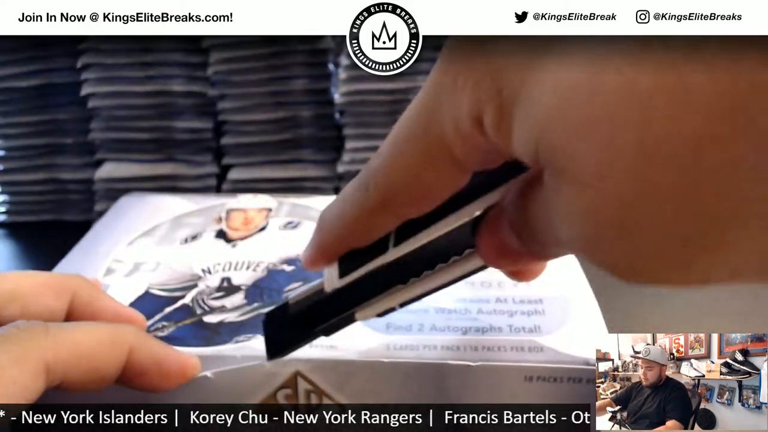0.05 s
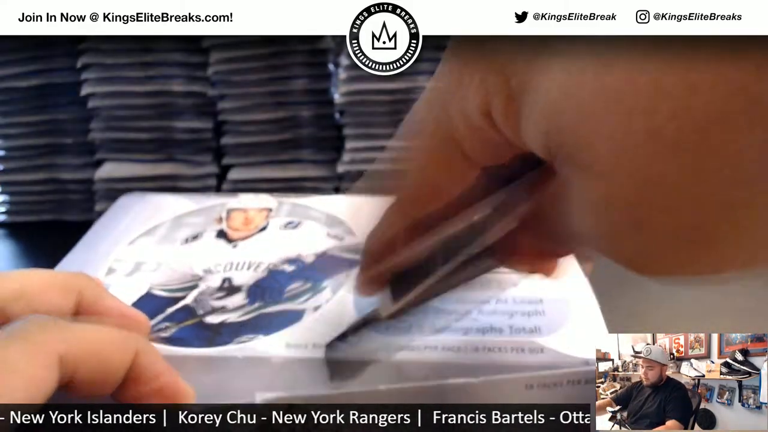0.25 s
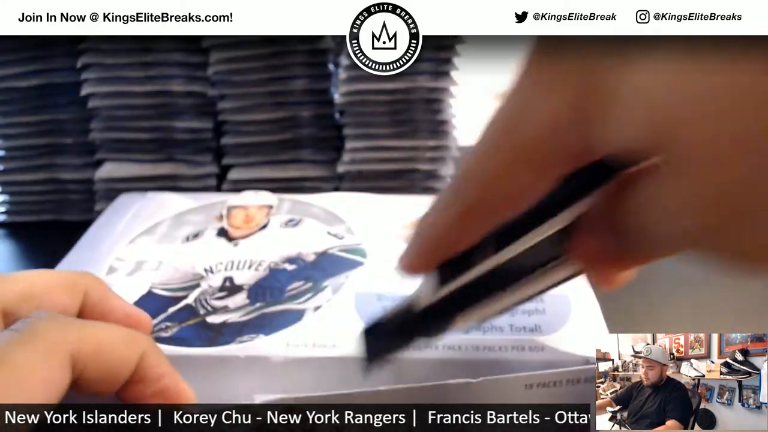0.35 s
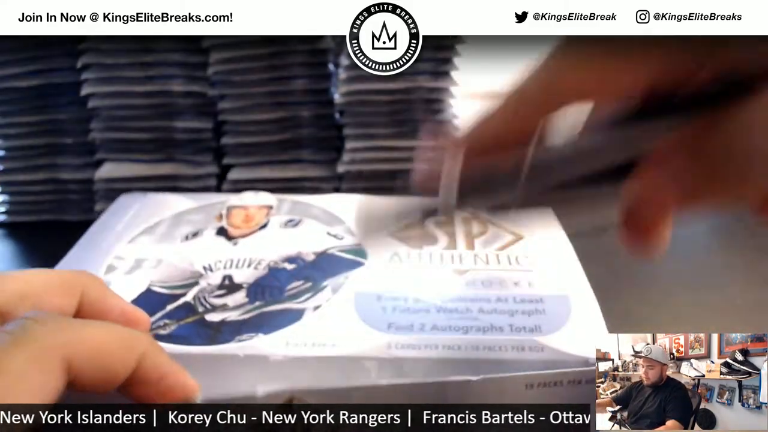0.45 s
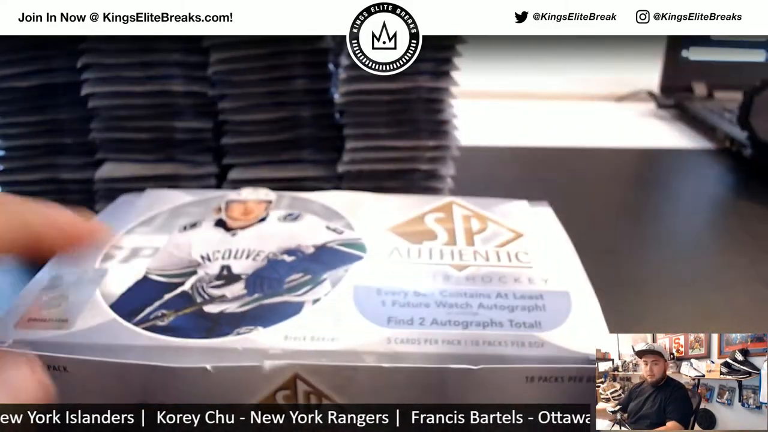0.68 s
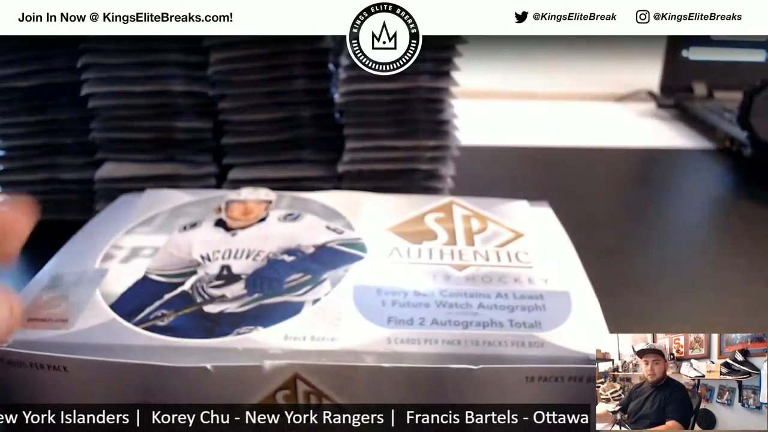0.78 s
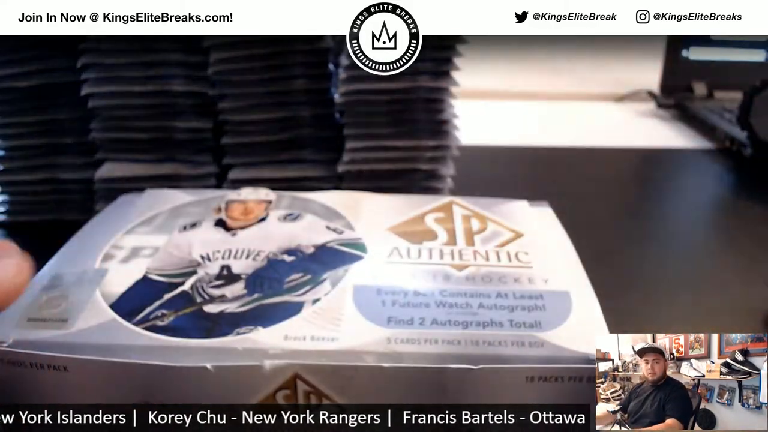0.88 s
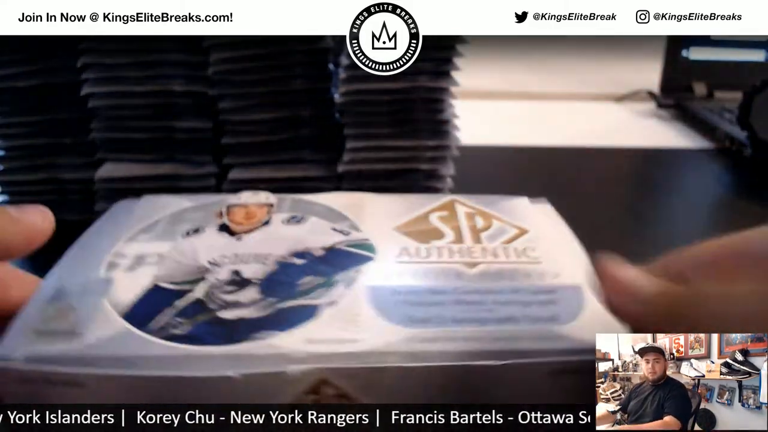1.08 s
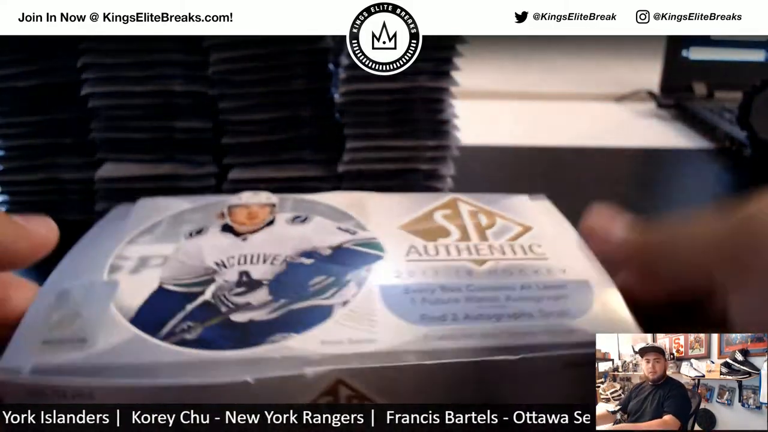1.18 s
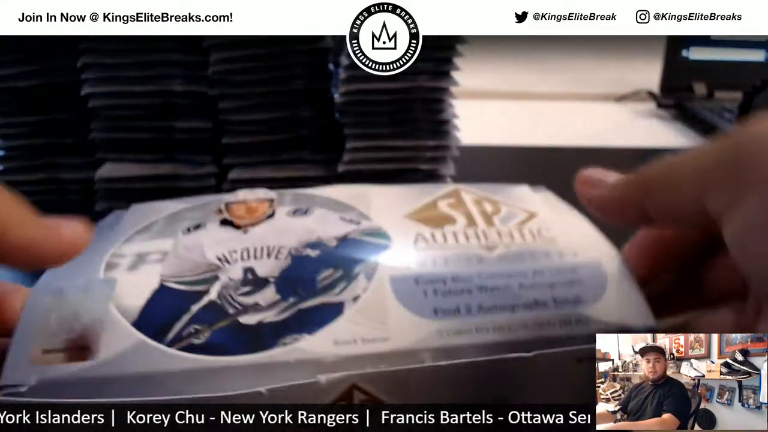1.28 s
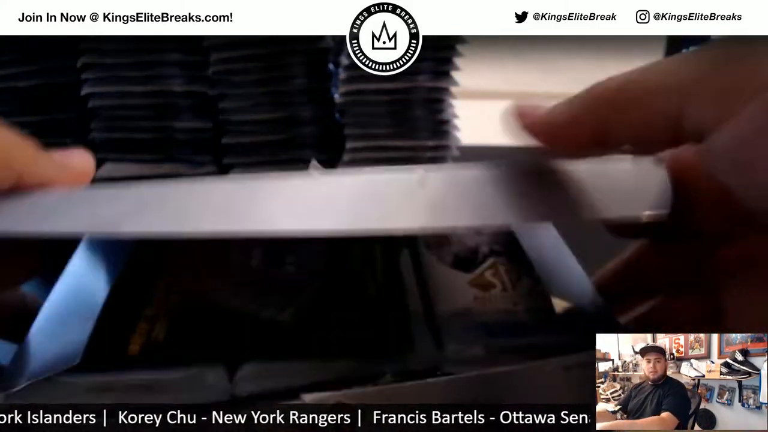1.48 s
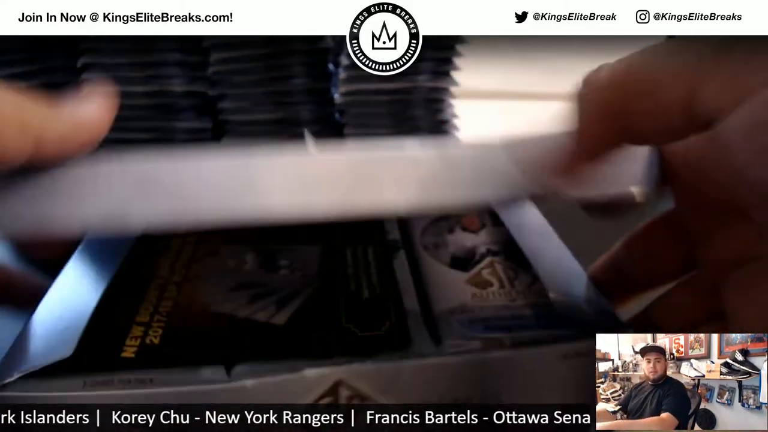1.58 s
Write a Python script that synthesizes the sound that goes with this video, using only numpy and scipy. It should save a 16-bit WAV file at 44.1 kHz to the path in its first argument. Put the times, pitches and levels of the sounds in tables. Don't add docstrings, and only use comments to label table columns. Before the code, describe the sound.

Close microphone in a quiet furnished room: a bright plastic crack as a box is cut, a quick ratcheting click, a tool dropped on a tabletop, soft fingertip taps, then a cardboard lid springs free.

```python
import sys
import numpy as np
from scipy import signal
from scipy.fft import rfft, irfft
from scipy.io import wavfile
from scipy.ndimage import uniform_filter1d

SR = 44100
rng = np.random.default_rng(int(sys.argv[2]) if len(sys.argv) > 2 else 0)


def volts_from_decibels(level):
    exponent = np.asarray(level, float) / 20
    return 10 ** exponent


def wav_out(sig):
    wavfile.write(sys.argv[1], SR, np.round(np.clip(np.atleast_2d(sig).T, -1, 1) * 32767).astype(np.int16))


N = 72765
T = np.arange(N) / SR


def unit(x):
    return x / np.sqrt(np.mean(x ** 2))


def curve(rows):
    time_s, level_db = np.array(rows, float).T
    return volts_from_decibels(np.interp(T, time_s, level_db))


def colour(x, points):
    hz, db = np.array(points, float).T
    log_hz = np.log(np.maximum(np.fft.rfftfreq(len(x), 1 / SR), 1))
    gain = volts_from_decibels(np.interp(log_hz, np.log(hz), db))
    return unit(irfft(rfft(x) * gain, len(x)))


def band(x, hz, width_hz):
    b, a = signal.iirpeak(min(hz, 0.4 * SR), hz / width_hz, SR)
    return signal.lfilter(b, a, x)


def struck(modes, hits):
    spot_db = 1.2
    out = np.zeros(N)
    spots = rng.standard_normal((len(hits), len(modes)))
    for (hz, mode_db, t60_s), mode_spots in zip(modes, spots.T):
        push = np.zeros(N + 400)
        for (start_s, hit_db, contact_ms), spot in zip(hits, mode_spots):
            length = int(np.clip(contact_ms * SR / 1000, 3, 390))
            i = int(start_s * SR)
            bump = np.hanning(length + 2)[1:-1] * 2 / length
            push[i:i + length] += bump * volts_from_decibels(hit_db + mode_db + spot_db * spot)
        decay = np.log(1000) / (max(t60_s, 0.005) * SR)
        pole = np.exp(2j * np.pi * hz / SR - decay)
        ring = signal.lfilter([1], [1, -pole], push[:N]).imag
        b, a = signal.butter(2, hz / 3, "high", fs=SR)
        out += signal.lfilter(b, a, ring)
    return out


def box_cut():
    # pitch_hz, level_db, t60_s
    box_modes = [(129.6, -4.5, 0.15), (163, -9.5, 0.098), (242, -5.5, 0.069), (360, -4.5, 0.037),
                 (452.5, 2.5, 0.036), (532.6, 6, 0.032), (707, -3, 0.034), (1109.5, 3.5, 0.047),
                 (1163, -5, 0.051), (1324, -2, 0.02), (1420, -6, 0.045), (1626, -30, 0.12),
                 (2135, -11, 0.027)]
    # start_s, level_db, contact_ms
    box_hits = [
        (0.1642, -46, 0.92),
        (0.1749, -16.5, 0.39),
        (.1772, -26, 1),
        (0.188, -32.5, 0.47),
        (0.194, -37, 0.19),
    ]
    return struck(box_modes, box_hits)


def cracks():
    # start_s, level_db, centre_hz, fade_ms
    bursts = [(0.115, -58.5, 5000, 1.6), (0.1709, -10, 6030, 0.7), (.1735, -20, 5400, 1.1),
              (.182, -24, 6650, 0.67), (0.194, -27, 4740, 1.3), (.449, -26, 4900, 1.26),
              (0.4636, -27.5, 5200, 2.2), (0.475, -36, 7460, 1.7), (.4815, -25.5, 6600, 1.9),
              (.492, -26, 7600, 1.14), (0.5154, -27, 4860, 2.13), (.526, -46, 4130, 2.5),
              (0.8469, -27, 3100, 3.3), (.856, -34, 3600, 13.6), (.868, -42, 3960, 2.9),
              (1.058, -47.5, 3500, 2.5), (1.141, -58.5, 3480, 2.1), (1.229, -48, 4000, 3.4),
              (1.306, -41, 2500, 12), (1.317, -36.5, 4000, 4), (1.327, -28, 4930, 5.9),
              (1.351, -38, 4500, 2), (1.38, -30, 4180, 1.56), (1.526, -46.5, 2890, 3.9),
              (1.617, -47, 2800, 2.4)]
    width = 1.26
    rise_ms, tail_db, tail_ms = 0.4, -21, 6.8
    length = 2000
    out = np.zeros(N + length)
    age_ms = np.arange(length) / SR * 1000
    noises = rng.standard_normal((len(bursts), length))
    for (start_s, level_db, hz, fade_ms), noise in zip(bursts, noises):
        i = int(start_s * SR)
        tone = band(band(noise, hz, width * hz), hz, width * hz)
        fade = np.exp(-age_ms / fade_ms) + volts_from_decibels(tail_db) * np.exp(-age_ms / tail_ms)
        rise = np.minimum(age_ms / rise_ms, 1)
        out[i:i + length] += volts_from_decibels(level_db) * unit(tone) * fade * rise
    return out[:N]


def cutter_drop():
    # pitch_hz, level_db, t60_s
    table_modes = [(54.4, -30, 0.45), (114.3, -2.5, 0.13), (173, -19, 0.095), (233, 2.5, 0.033),
                   (298.2, 0.5, 0.11), (414, 3.5, 0.017), (620, 0.5, 0.017), (788, -0.5, 0.015),
                   (1193, -11, 0.047), (1360, -17, 0.098), (1844, -12.5, 0.051), (2400, -54, 0.032)]
    # start_s, level_db, contact_ms
    table_hits = [
        (0.846, -17.5, 0.37),
        (0.8467, -27, 2.5),
        (0.8538, -30, 1.47),
        (.863, -32, 0.27),
        (.870, -27, 0.31),
        (0.894, -30.5, 1.9),
        (0.924, -47, 0.72),
        (1.043, -40, 5.3),
        (1.085, -41, 5.9),
        (1.119, -44, 4.2),
    ]
    return struck(table_modes, table_hits)


def lid_pop():
    # pitch_hz, level_db, t60_s
    lid_modes = [(63.6, -20.5, 0.056), (95, -11, 0.101), (214, -1.5, 0.032), (264, -2.5, 0.068),
                 (391, -17.5, 0.047), (623, -38, 0.035), (950, -5.5, 0.03), (1028, 0, 0.035),
                 (1170, 3, 0.0083), (1416, -5, 0.097), (1663, -8, 0.022), (1740, -10, 0.052),
                 (2420, -7, 0.017)]
    # start_s, level_db, contact_ms
    lid_hits = [(1.229, -43.5, 0.17), (1.305, -43, 0.19), (1.316, -40, 0.45), (1.3253, -13, 1.7),
                (1.3284, -20, 0.28), (1.3311, -18, 0.47), (1.340, -22.5, 0.16), (1.347, -24, 0.62),
                (1.358, -51, .4), (1.367, -36, 0.62), (1.378, -30.5, 1.03), (1.528, -51, 0.22)]
    return struck(lid_modes, lid_hits)


def taps():
    # pitch_hz, level_db, t60_s
    tap_modes = [(86, -1.5, 0.07), (283, -2, 0.042), (520, -3.5, 0.032), (770, 6.5, 0.011),
                 (1360, 3.5, 0.012), (1860, -7, 0.023)]
    # start_s, level_db, contact_ms
    tap_hits = [(.449, -41.5, 0.49), (.454, -41.5, 0.8), (.545, -54, .5), (.635, -46, .6),
                (1.058, -40.5, 0.66), (1.117, -44, 0.64), (1.139, -38.5, 0.79), (1.146, -33.5, 0.41),
                (1.155, -39.5, 0.96), (1.164, -40.5, 0.47), (1.283, -36.5, 0.26), (1.555, -40, 0.97),
                (1.617, -42, 0.42)]
    return struck(tap_modes, tap_hits)


def grains(rate_per_s, spread_db):
    on = rng.random(N) < rate_per_s / SR
    size = rng.standard_normal(N) * volts_from_decibels(spread_db * rng.exponential(1, N))
    return on * size


def card_rustle():
    # time_s, level_db
    effort = [(.15, -125), (.168, -29), (.2, -39), (.32, -54), (.36, -51), (.42, -71.5), (.95, -70),
              (1.13, -54.5), (1.14, -36), (1.17, -49), (1.19, -60), (1.225, -56), (1.235, -47),
              (1.3, -46.5), (1.335, -25), (1.37, -29), (1.43, -51), (1.65, -56.5)]
    # pitch_hz, level_db
    card_tone = [(60, -6.5), (250, -6.5), (450, -1.5), (800, -6.5), (1200, -7), (1620, -4.5), (1950, -14),
                 (10400, -31)]
    return curve(effort) * colour(grains(5000, 1.8), card_tone)


def film_slide():
    # time_s, level_db
    movement = [(.44, -110), (.45, -42.5), (.52, -51), (.56, -59), (.66, -58.5), (.83, -64.5), (.85, -37),
                (.9, -43), (1.05, -67.5)]
    # pitch_hz, level_db
    film_tone = [(800, -6.5), (1500, -4), (2380, -9.5), (3300, -0.5), (4100, -4), (5300, -6.5),
                 (6500, -11.5), (10400, -23)]
    return curve(movement) * colour(grains(6000, 2.33), film_tone)


def table_thrum():
    # time_s, level_db
    sway_level = [(0, -59), (.165, -58), (.19, -39), (.3, -40.5), (.4, -57), (.55, -51), (.62, -53.5),
                  (.84, -56), (.93, -34), (1., -51), (1.3, -53), (1.34, -49), (1.41, -37), (1.48, -55),
                  (1.55, -41.5), (1.65, -58)]
    hz, width_hz = 32.1, 21.6
    sway = band(band(rng.standard_normal(N), hz, width_hz), hz, width_hz)
    sway = sway / np.sqrt(uniform_filter1d(sway ** 2, size=3000))
    return curve(sway_level) * sway


def room(x):
    # pitch_hz, t60_s
    room_fade = [(100, .4), (500, 0.19), (1500, 0.21), (4000, 0.58), (10000, 0.34)]
    gap_ms = 2.8
    table_hz, table_t60 = np.array(room_fade).T
    age_s = T[:SR]
    tail = np.zeros(SR)
    for hz in 60 * 2 ** np.arange(0, 8, 0.5):
        t60_s = np.interp(np.log(hz), np.log(table_hz), table_t60)
        fade = np.exp(-np.log(1000) * age_s / t60_s)
        tail += band(rng.standard_normal(SR), hz, hz / 3) * fade
    tail = tail * np.clip(age_s * 1000 / gap_ms - 1, 0, 1)
    return signal.fftconvolve(x, tail / np.sqrt(np.sum(tail ** 2)))[:N]


def room_floor():
    # pitch_hz, level_db
    floor_tone = [(30, -21.5), (60, -18), (120, 1.5), (250, -6), (500, -9.5), (1000, -15.5), (2000, -22.5),
                  (10400, -32)]
    return volts_from_decibels(-59) * colour(rng.standard_normal(N), floor_tone)


def scene():
    near = box_cut() - cutter_drop() - lid_pop() + taps()
    near = near + cracks() + card_rustle() + film_slide()
    return (near + volts_from_decibels(-11) * room(near) + table_thrum() + room_floor())[None]


def holes(x):
    hole_hz, under_limit_db, spread_db = 5500, 36, 4
    f, _, z = signal.stft(x, SR, nperseg=512)
    power = (np.abs(z[:256]) ** 2).reshape(32, 8, -1).sum(axis=1) + 1e-20
    under_db = 10 * np.log10(power.sum(axis=0) / power)
    under_db = under_db + spread_db * rng.standard_normal(power.shape)
    drop = (under_db > under_limit_db) & (f[:256:8, None] > hole_hz)
    stay = np.vstack([np.repeat(~drop, 8, axis=0), ~drop[-1:]])
    return signal.istft(z * stay, SR, nperseg=512)[1][:N]


def treble_mutes(x):
    # start_s, end_s, pitch_hz above which the sound is gone
    mutes = [
        (0.154, 0.159, 900),
        (0.157, .166, 5500),
        (0.431, 0.444, 3240),
        (0.827, 0.839, 500),
        (.839, 0.842, 5000),
        (1.129, 1.134, 3820),
        (1.219, 1.226, 5500),
    ]
    for start_s, end_s, hz in mutes:
        low_pass = signal.butter(6, hz, fs=SR, output="sos")
        high = x - signal.sosfiltfilt(low_pass, x)
        inside_s = np.minimum(T - start_s, end_s - T)
        x = x - high * np.clip(inside_s / 0.0026 + 1, 0, 1)
    return x


def roll_off(x):
    return signal.sosfilt(signal.butter(12, 11660, fs=SR, output="sos"), x)


def record(dry):
    x = treble_mutes(holes(dry[0]))
    top_edge = signal.ellip(8, 0.2, 60, 10350, fs=SR, output="sos")
    x = signal.sosfilt(top_edge, x)
    return roll_off(x[None])


dry = scene()
out = record(dry)
wav_out(out)
```